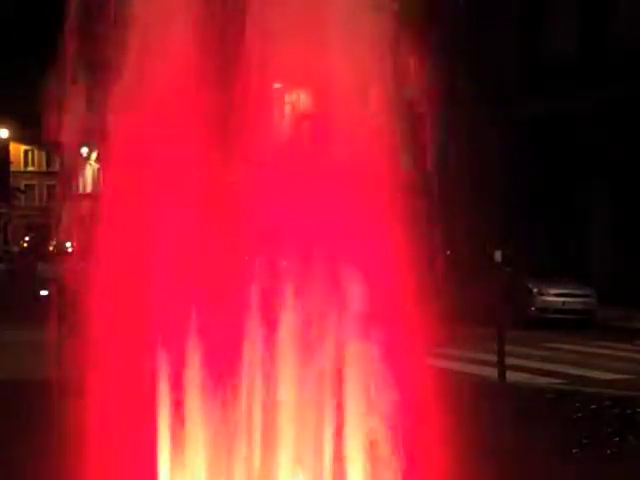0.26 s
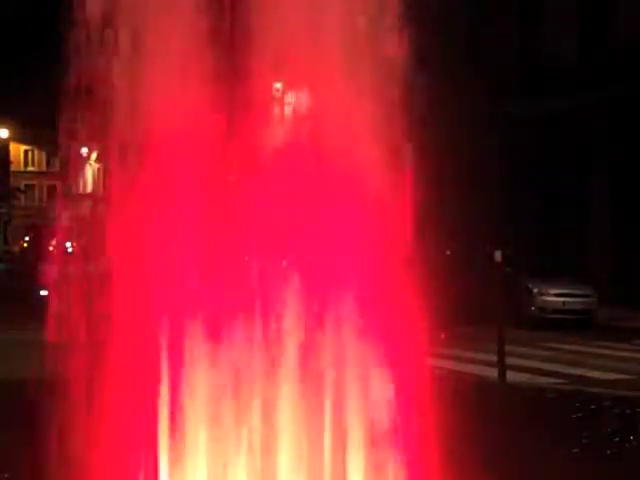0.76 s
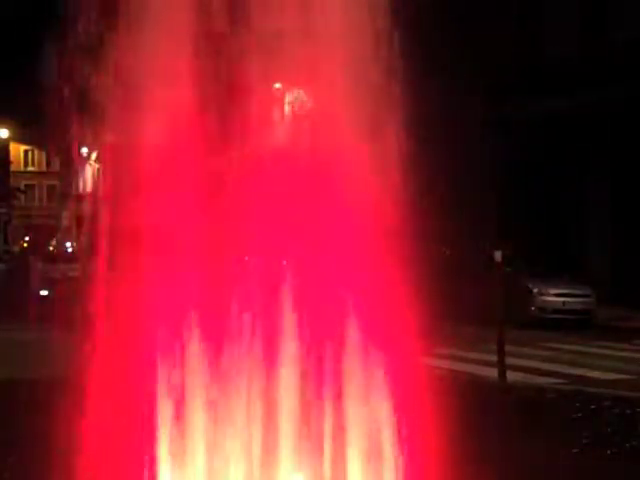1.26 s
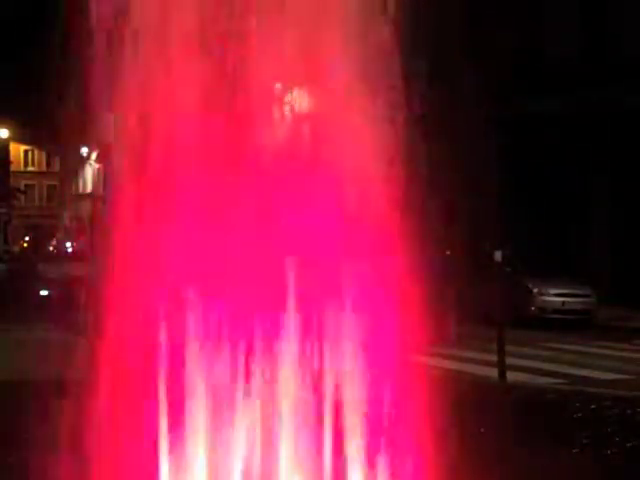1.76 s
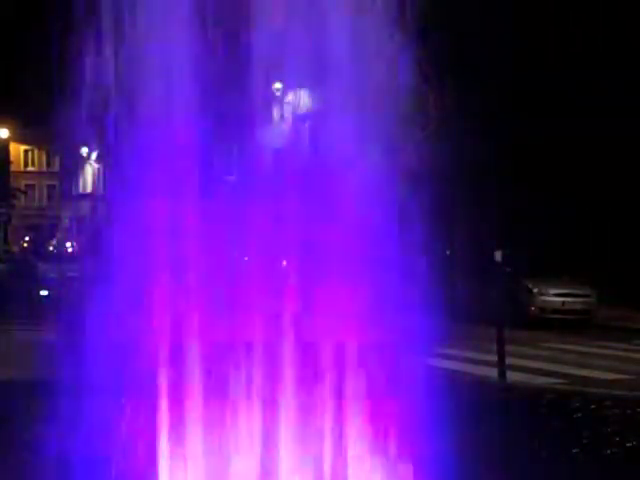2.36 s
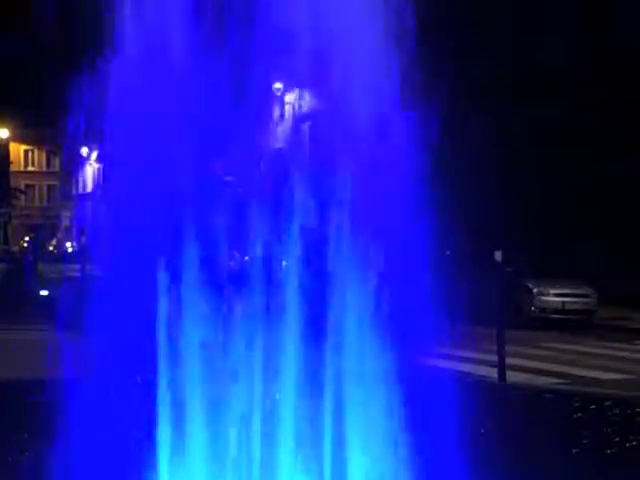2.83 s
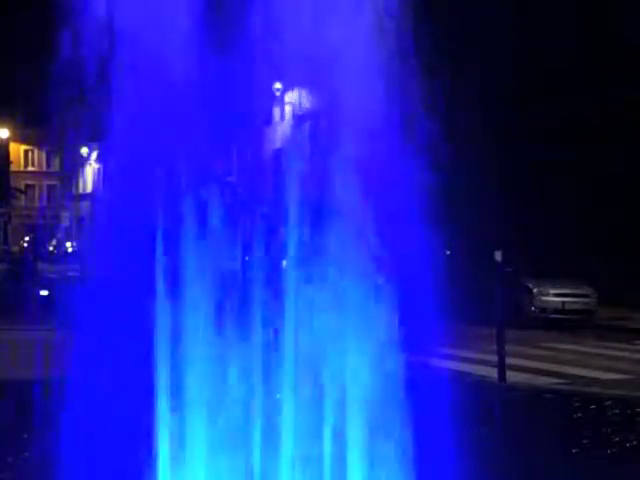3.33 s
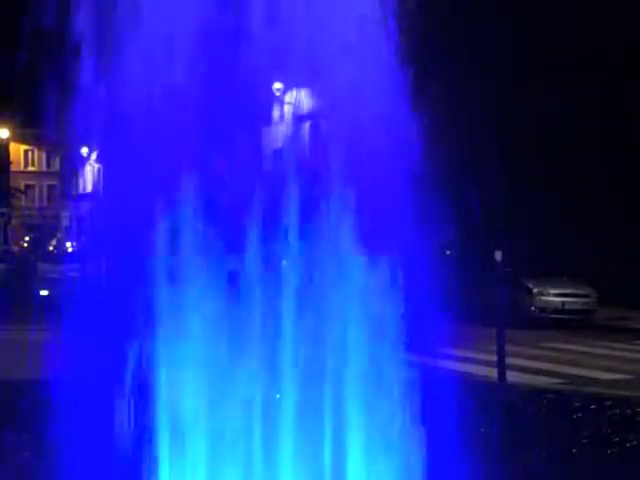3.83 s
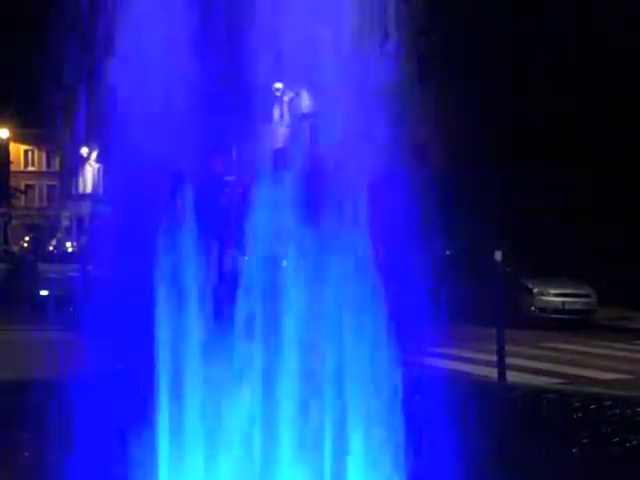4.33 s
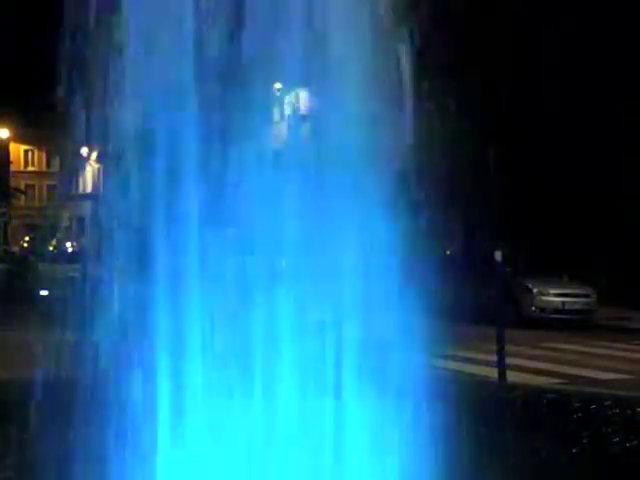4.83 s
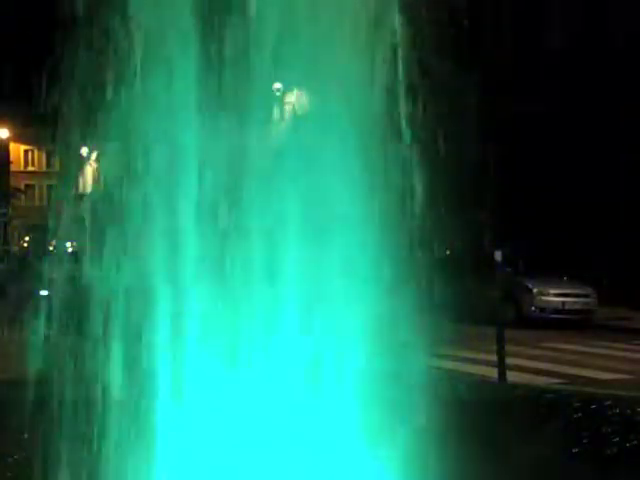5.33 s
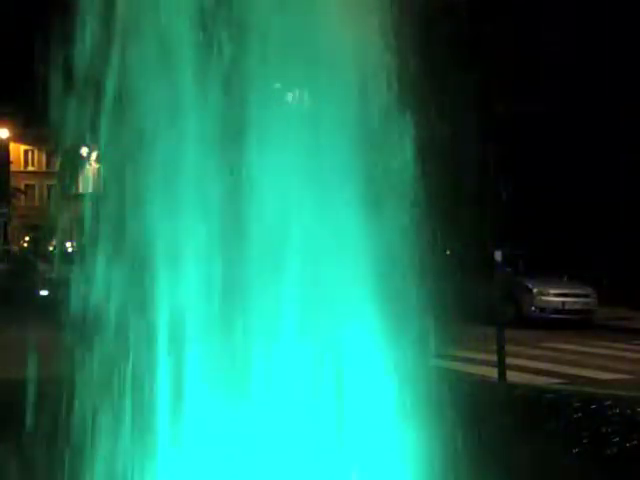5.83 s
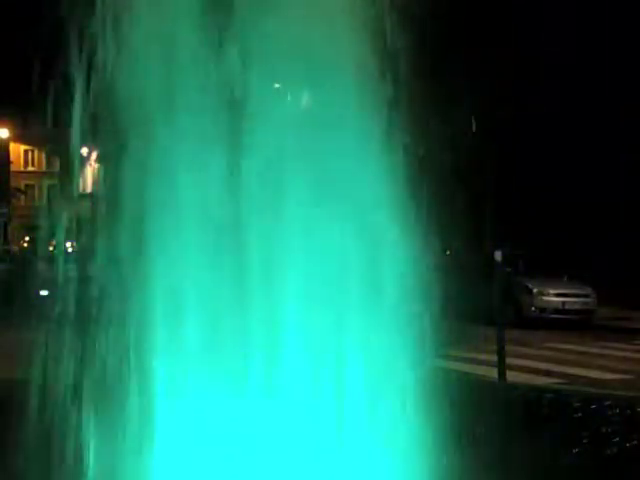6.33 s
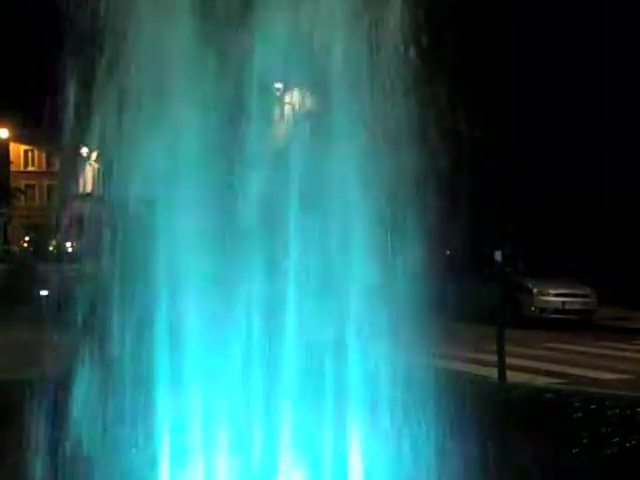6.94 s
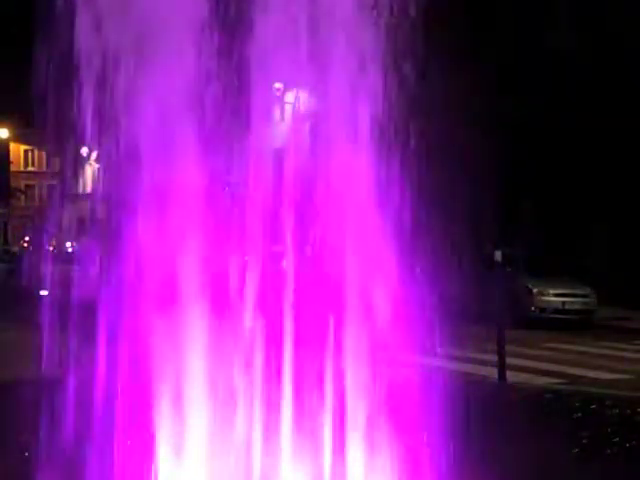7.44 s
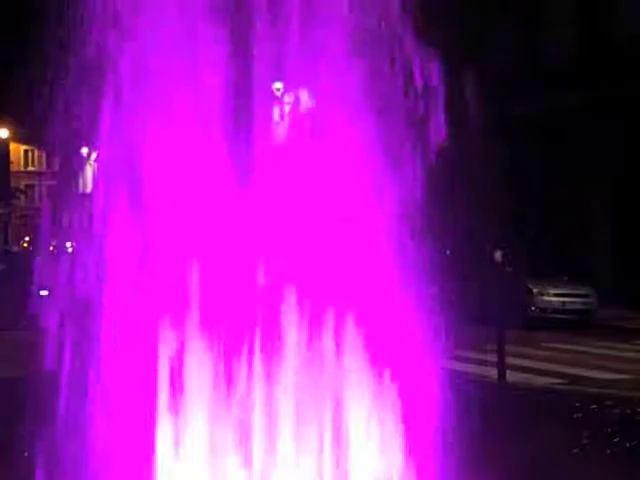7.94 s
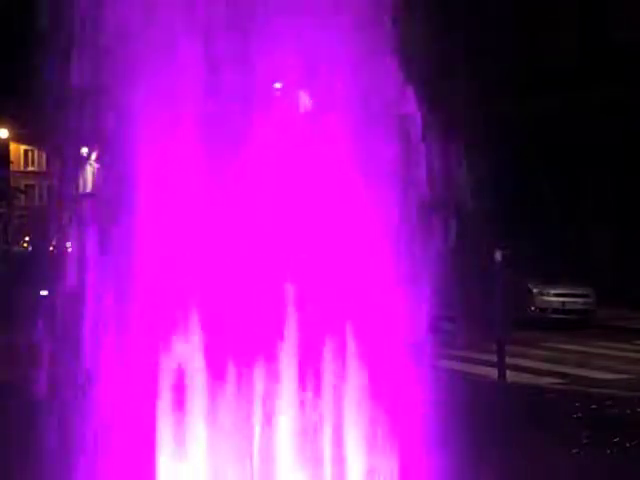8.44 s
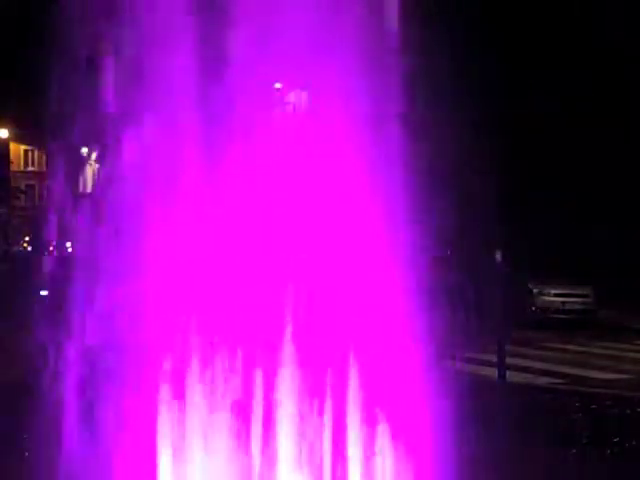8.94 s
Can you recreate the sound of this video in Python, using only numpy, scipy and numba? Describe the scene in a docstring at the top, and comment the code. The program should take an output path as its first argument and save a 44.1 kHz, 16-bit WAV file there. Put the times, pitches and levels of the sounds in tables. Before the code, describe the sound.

A tall fountain splashes steadily into its basin, with hissing spray, pattering drops and gurgling over faint traffic.

```python
"""A tall fountain splashes a few metres away on a town square at night.
Its jets break up and fall back in clumps: fine spray hisses, heavy drops patter, slap and leave
ringing bubbles, and the columns plunge into the basin and gurgle. Behind it, three engines hum over
the rumble of the streets. Two microphone ports ring in the treble."""
import sys
import numpy as np
from scipy import signal
from scipy.fft import rfft, irfft, next_fast_len
from scipy.io import wavfile
from numba import njit

SR = 44100
rng = np.random.default_rng(int(sys.argv[2]) if len(sys.argv) > 2 else 0)


def wav_out(sig):
    """Save sig, one row per channel (or a flat mono array), as 16-bit PCM at SR to the path in sys.argv[1]."""
    wavfile.write(sys.argv[1], SR, np.round(np.clip(np.atleast_2d(sig).T, -1, 1) * 32767).astype(np.int16))


N = 405274
TIME = np.arange(N) / SR
SIZE = next_fast_len(N + 4096)
FREQS = np.maximum(np.arange(SIZE // 2 + 1) * SR / SIZE, 1)
SECTOR_LEADS_S = np.linspace(-2.8e-5, 2.4e-5, 4)  # fountain width: each sector's lead at the left port


def undb(db):
    """Decibels to gain."""
    return 10 ** (np.asarray(db) / 20)


def unit(x):
    """Scale to rms 1."""
    return x / np.sqrt(np.mean(x ** 2))


def curves(table):
    """Automation lanes: each column after t/s, one value a sample."""
    times, *columns = np.transpose(table)
    return [np.interp(TIME, times, column) for column in columns]


def response(points):
    """An EQ curve through (f/Hz, gain/dB) points."""
    hz, db = np.transpose(points)
    return undb(np.interp(np.log(FREQS), np.log(hz), db))


def filtered(x, gain):
    """Apply a frequency response."""
    return irfft(rfft(x, SIZE) * gain, SIZE)[..., :N]


def drift(rate_hz):
    """Smooth random modulation up to about `rate_hz`, rms 1."""
    return unit(filtered(rng.standard_normal(N), 1 / (1 + (FREQS / rate_hz) ** 4)))


def swell(start_s, length_s, attack_s, release_s):
    """A 0-to-1 envelope with ramps centred on its start and its end."""
    rise = (TIME - start_s) / attack_s
    fall = (start_s + length_s - TIME) / release_s
    return np.clip(.5 + np.minimum(rise, fall), 0, 1)


def impacts(per_s, spread_db):
    """Randomly timed impulses, a few much larger than the rest."""
    hits = rng.random(N) < per_s / SR
    return hits * undb(spread_db * np.minimum(rng.standard_normal(N), 2.5))


def clicks(per_s, spread_db):
    """Impacts of random polarity, rms 1."""
    return unit(impacts(per_s, spread_db) * rng.choice([-1, 1], N))


def at_ports(x, lead_s):
    """Pan by time: the sound reaches the left port `lead_s` before the right."""
    return filtered(x, np.exp(1j * np.pi * FREQS * lead_s * np.array([[1], [-1]])))


def engine(automation, orders, waver_db):
    """From afar only the lowest orders of an exhaust carry, wavering on the way."""
    firing_hz, level_db = curves(automation)
    phase = 2 * np.pi * np.cumsum(firing_hz * (1 + 0.0039 * drift(rate_hz=2.6))) / SR
    hum = sum(undb(db) * np.sin(order * phase) for order, db in orders)
    return np.sqrt(2) * hum * undb(level_db + waver_db * drift(rate_hz=4))


# Engines idling, cruising then slowing, and pulling away: (t/s, firing rate/Hz, level/dB)
IDLE_ENGINE = [(0, 62, -62), (.35, 62.6, -48.5), (1.8, 61.8, -48), (2.5, 60.5, -53), (3.5, 60.2, -49),
               (4.9, 61, -68), (7.4, 61.6, -52.5), (8.6, 60.6, -53), (9.19, 60.3, -42)]
CRUISE_ENGINE = [(0, 77, -64), (1.5, 78.3, -61), (2.7, 77.6, -47), (4.1, 77, -50), (4.6, 77, -66),
                 (5.3, 77.9, -49.5), (7.8, 72.4, -46.5), (8.4, 73, -58), (9.19, 67.5, -52)]
PULLING_ENGINE = [(0, 38.56, -52), (2.7, 41.6, -50), (6, 49.3, -52.5), (7.3, 53.1, -54), (9.19, 52, -60)]
# Exhaust harmonics, running easy and under load: (multiple of the firing rate, gain/dB)
EASY_ORDERS = [(1, 1), (2, -12.5)]
LOADED_ORDERS = [(1, -6), (2, -2.5), (3, -9)]
# Fader ride on the bed of tyres and far traffic: (t/s, level/dB)
RUMBLE_RIDE = [(0, -42.5), (3.9, -45.5), (5.1, -42.5), (5.8, -44.5), (8.2, -44.5), (9.19, -44)]
# Dark tone of that bed: (f/Hz, gain/dB)
RUMBLE_EQ = [(20, -28), (33, -26), (47, -16), (65, -6), (90, 1.5), (120, 2), (145, 0.5), (170, 1),
             (300, -3.5), (1000, -4.5), (5000, -65)]
def traffic():
    """Three engines over street rumble, earlier on the left and a little louder on the right."""
    rumble_db, = curves(RUMBLE_RIDE)
    engines = engine(IDLE_ENGINE, EASY_ORDERS, waver_db=3.0)
    engines += engine(CRUISE_ENGINE, EASY_ORDERS, waver_db=-2.5)
    engines += engine(PULLING_ENGINE, LOADED_ORDERS, waver_db=0.5)
    rumble = unit(filtered(rng.standard_normal(N), response(RUMBLE_EQ))) * undb(rumble_db)
    return at_ports(engines + rumble, lead_s=0.00095) * undb([[-1.6], [1.2]])


# Airy top of the mist: (f/Hz, gain/dB)
MIST_EQ = [(1000, -16), (4000, -5), (6000, 2), (9000, 0), (12000, 2), (14200, 2.5)]
def mist():
    """The nozzles and the finest droplets hiss evenly, differently at each port."""
    return unit(filtered(rng.standard_normal((2, N)), response(MIST_EQ))) * undb(-30.5)


@njit
def ring_bubbles(starts, hz, cycles, gains, glide):
    """Bubbles ring down 60 dB over `cycles`, rising by the fraction `glide` as they near the surface."""
    out = np.zeros(N)
    for k in range(len(starts)):
        length = int(cycles[k] * SR / hz[k])
        for i in range(min(length, N - starts[k])):
            age = i / length
            phase = 2 * np.pi * hz[k] * i / SR * (1 + glide * age / 2)
            out[starts[k] + i] += gains[k] * np.exp(-6.9 * age) * np.sin(phase)
    return out


def bubble_cloud(low_hz, high_hz, cycles, spread_db, count):
    """Bubbles of all sizes between two pitches, ringing at random times."""
    when, pitch, life, rarity = rng.random((count, 4)).T
    starts = (when * N).astype(np.int64)
    hz = low_hz * (high_hz / low_hz) ** pitch
    gains = hz * undb(-spread_db * np.log(np.maximum(rarity, .01)))
    return unit(ring_bubbles(starts, hz, cycles * (.5 + life), gains, glide=0.28))


# Flow of the jets, riding plunge, spray and patter: (t/s, level/dB about the usual flow)
JET_FLOW = [(0, -0.13), (1.5, 0.15), (2.7, 0.35), (3.7, 0), (4.1, -.8), (4.9, -0.8), (5.4, 0.13),
            (7.1, -0.15), (7.8, 1.14), (9.19, 0.3)]
# Hollow body of the churning basin: (f/Hz, gain/dB)
PLUNGE_EQ = [(60, -29), (160, -9.5), (270, -4.5), (330, -6.5), (400, -0.5), (480, .5), (560, -1), (640, -3),
             (750, -1.5), (900, -4), (1100, -8), (1600, -8.5), (3000, -6.5), (8000, -41)]
def plunge():
    """The columns drive air under water: large bubbles gurgle in a wash that follows the flow."""
    flow_db, = curves(JET_FLOW)
    body = response(PLUNGE_EQ)
    gurgle = bubble_cloud(low_hz=164, high_hz=1374, cycles=10.8, spread_db=3.0, count=6000)
    wash = filtered(rng.standard_normal(N), 1 / np.sqrt(1 + (FREQS / 2500) ** 4))
    churn = unit(filtered(wash, body)) + undb(-6.5) * unit(filtered(gurgle, body))
    level_db = -34 + 0.65 * flow_db + 1.17 * drift(rate_hz=12)
    return unit(churn) * undb(level_db)


# Falling glugs from slugs of water diving deep: (t/s, length/s, first f/Hz, last f/Hz, level/dB)
GUSH_CUES = [(0.117, 0.14, 676, 230, -34), (0.658, .13, 800, 420, -35), (1.302, 0.23, 750, 405, -36),
             (2.628, 0.35, 860, 435, -37.5), (5.281, 0.22, 650, 450, -39), (7.32, 0.11, 750, 483, -35),
             (8.418, 0.33, 920, 252, -37.5), (8.98, 0.14, 690, 446, -35.5)]
def gush(start_s, length_s, first_hz, last_hz, level_db, count):
    """A slug of water opens a growing cavity, which sheds ever larger, lower and fainter bubbles."""
    progress, scatter, strength = rng.random((count, 3)).T
    starts = ((start_s + length_s * progress) * SR).astype(np.int64)
    hz = first_hz * (last_hz / first_hz) ** progress * 2 ** (1.4 * (scatter - .5))
    gains = (.5 + strength) * np.sqrt(hz)
    glugs = ring_bubbles(starts, hz, cycles=np.full(count, 14.), gains=gains, glide=0.12)
    return unit(glugs) * np.sqrt(length_s * SR / N) * undb(level_db)  # rms over the gush's length


# Bright snap of a drop hitting water, stray or near: (f/Hz, gain/dB)
SLAP_EQ = [(400, -30), (1500, -9), (3000, -23), (5500, 1.5), (8000, -1.5), (10000, -19), (14000, -7)]
def stray_drops():
    """Smaller drops land close by at random and tick through the rush."""
    ticks = filtered(clicks(per_s=30, spread_db=2.5), response(SLAP_EQ))
    return at_ports(unit(ticks) * undb(-35), SECTOR_LEADS_S.mean())


# Big close drops, as rms over 2 ms: (t/s, pre-EQ slap level/dB, pop f/Hz, pop level/dB)
DROP_CUES = [(.927, -13, 5000, -20), (.9536, -12, 4600, -19), (1.1965, -12, 3700, -17),
             (1.295, -13, 5100, -26), (1.911, -17, 4200, -22), (1.9338, -24, 2900, -18),
             (1.9583, -8, 3700, -16), (2.2245, -16, 4200, -21), (2.538, -21, 2950, -19),
             (2.7285, -13, 5150, -27), (3.8263, -10.5, 2550, -13), (3.8998, -9, 3800, -16),
             (4.678, -15, 5100, -22), (5.231, -22, 4100, -16), (5.33, -17, 4350, -25),
             (6.5517, -16, 4000, -17), (6.7065, -11, 5000, -25), (6.9616, -25, 3000, -20),
             (6.9808, -22, 2900, -16.5), (7.3937, -16, 4200, -13), (8.034, -15, 2650, -21),
             (9.012, -17, 4600, -19)]
def near_drops():
    """A big drop slaps down and scatters droplets for a moment; its cavity gives a short pitched pop."""
    slap_decay_s, pop_decay_cycles, rms_window_s = .0008, .62, .002
    slaps, pops = np.zeros((2, N))
    age = np.arange(512) / SR
    for start_s, slap_db, pop_hz, pop_db in DROP_CUES:
        slap = rng.standard_normal(len(age)) * np.exp(-age / slap_decay_s)
        # the cavity takes a moment to open, so the pop swells before it dies
        pop = np.sin(2 * np.pi * pop_hz * age) * age * np.exp(-age * pop_hz / pop_decay_cycles)
        span = int(start_s * SR) + np.arange(len(age))
        slaps[span] += undb(slap_db) * slap / np.linalg.norm(slap)
        pops[span] += undb(pop_db) * pop / np.linalg.norm(pop)
    drops = (filtered(slaps, response(SLAP_EQ)) + pops) * np.sqrt(rms_window_s * SR)
    return at_ports(drops, SECTOR_LEADS_S.mean())


def clumps(per_s, decay_s, depth):
    """Gain from the density of drops: each lump of water bursts at once and trails off."""
    onsets = impacts(per_s, spread_db=2.0)
    bursts = signal.lfilter([1], [1, -np.exp(-1 / (decay_s * SR))], onsets)
    return np.sqrt(1 + depth * bursts / bursts.mean())


# Lulls, when little water comes down: (t/s, length/s, flow dip/dB)
LULL_CUES = [(1.078, 0.13, -3), (1.98, 0.059, -3), (3.168, 0.071, -3), (7.44, 0.21, -1.7), (8.228, .11, -3),
             (8.874, 0.056, -2.3)]
# Accents from big lumps of water landing: (t/s, length/s, spray gain/dB, patter gain/dB)
SPLASH_CUES = [(.65, 0.065, 2, 3.5), (0.869, 0.016, 7.5, 0), (1.28, 0.032, 4.5, -2), (1.357, 0.045, 0.5, 6),
               (1.87, 0.061, 1.5, 3.5), (2.22, .04, 1, 4), (2.53, 0.062, 1, 3), (2.714, 0.096, 1.5, .5),
               (3.27, 0.063, 3, 1), (3.477, 0.043, 3.5, 4.5), (3.782, 0.053, 1.5, 6.5),
               (4.68, 0.05, 3.2, 2.5), (5.207, 0.045, 1.3, 2), (5.302, 0.082, 0.5, 5),
               (5.51, 0.063, 2.5, 4.5), (6.19, 0.15, 1.2, 2.5), (6.355, 0.085, 3, 2), (7.189, .05, 3, 2),
               (7.783, 0.16, 0.4, 1.8), (7.997, 0.046, 2, -1), (8.425, 0.062, 0.3, 5),
               (8.94, 0.091, 1.5, 3.5)]
def fall_levels():
    """Spray and patter levels in dB: both follow the flow, duck in the lulls and move with splashes."""
    flow_db, = curves(JET_FLOW)
    for start_s, length_s, dip_db in LULL_CUES:
        flow_db += dip_db * swell(start_s, length_s, attack_s=0.028, release_s=0.028)
    spray_db = -24 + flow_db
    patter_db = -32 + 0.63 * flow_db + 0.5 * drift(rate_hz=6.5)
    for start_s, length_s, spray_gain_db, patter_gain_db in SPLASH_CUES:
        splash = swell(start_s, length_s, attack_s=0.014, release_s=0.047)
        spray_db += spray_gain_db * splash
        patter_db += patter_gain_db * splash
    return spray_db, patter_db


# Sizzle of the fine spray and midrange of the heavy patter: (f/Hz, gain/dB)
SPRAY_EQ = [(500, -20), (1500, -13), (3000, -4), (4200, -3.5), (5200, -3.5), (6100, 0), (7800, -2),
            (9000, -3), (10000, -7), (12000, -11.5), (14200, -11.5)]
PATTER_EQ = [(300, -21), (900, -7.5), (1500, -4.5), (1820, -1), (2020, -3.5), (2250, -1), (3000, -2),
             (4000, -3), (5200, -1), (8000, -10.5), (14000, -19)]
def falling_water():
    """Sheets of fine spray and heavier drops strike the basin all across its width."""
    spray_db, patter_db = fall_levels()
    surge = undb(0.77 * drift(rate_hz=22))
    spray, patter = np.zeros((2, 2, N))
    for lead_s in SECTOR_LEADS_S:
        density = surge * clumps(per_s=48, decay_s=0.0018, depth=0.38)
        fine = clicks(per_s=11000, spread_db=3.5)
        heavy = clicks(per_s=700, spread_db=4.0)
        # a heavy drop also has a sharp edge, and spray also has some body
        spray += at_ports(density * (fine + undb(-12) * heavy), lead_s)
        patter += at_ports(density * (heavy + undb(2) * fine), lead_s)
    # some drops trap air, which rings briefly
    plinks = bubble_cloud(low_hz=1000, high_hz=6000, cycles=60, spread_db=2.8, count=4000)
    patter = unit(patter) + undb(-4) * plinks
    spray = unit(filtered(spray, response(SPRAY_EQ))) * undb(spray_db)
    patter = unit(filtered(patter, response(PATTER_EQ))) * undb(patter_db)
    return spray + patter


def scene():
    """The fountain in front, the traffic behind."""
    gushes = sum(gush(*cue, count=60) for cue in GUSH_CUES)
    return falling_water() + mist() + near_drops() + plunge() + gushes + traffic() + stray_drops()


# Treble resonance of the microphone ports, left then right: (f/Hz, width/Hz, resonance gain/dB)
PORT_RESONANCES = [(7830, 860, 12), (6420, 1340, 4)]
# Treble loss of the right port: (f/Hz, gain/dB)
RIGHT_PORT_EQ = [(6500, -1), (7000, -3), (8000, -6.5), (9000, -10.5), (10000, -8.5), (12000, -15.5),
                 (14000, -28)]
def record(dry):
    """Each port rings at its own pitch; the phone folds the midrange to mono, clips and cuts the top."""
    ports = np.array([1 + undb(db) / (1 + 1j * hz / width_hz * (FREQS / hz - hz / FREQS))
                      for hz, width_hz, db in PORT_RESONANCES])
    ports[1] *= response(RIGHT_PORT_EQ)
    left, right = filtered(dry, ports)
    side_eq = response([(70, 2), (150, -9), (700, -14), (2500, -68),
                        (4700, -78), (5500, -7), (6400, -0.5)])
    mid = (left + right) / 2
    side = filtered((left - right) / 2, side_eq)
    stereo = np.clip([mid + side, mid - side], -.88, .88)
    high_cut = signal.ellip(12, .2, 80, 14200, fs=SR, output="sos")
    return signal.sosfilt(high_cut, stereo)


dry = scene()
out = record(dry)
wav_out(out)
```